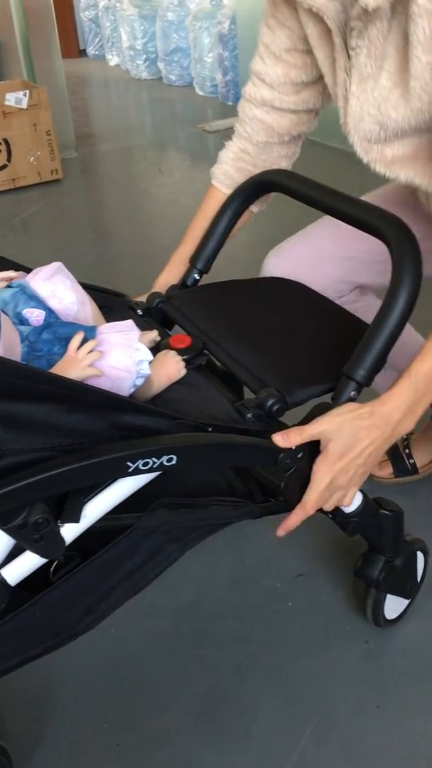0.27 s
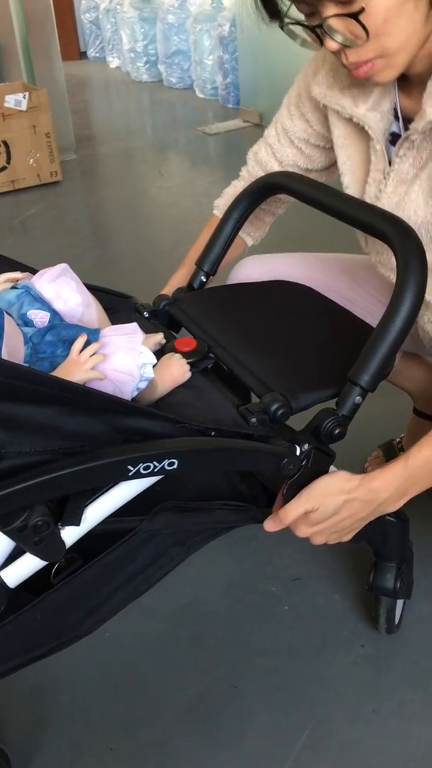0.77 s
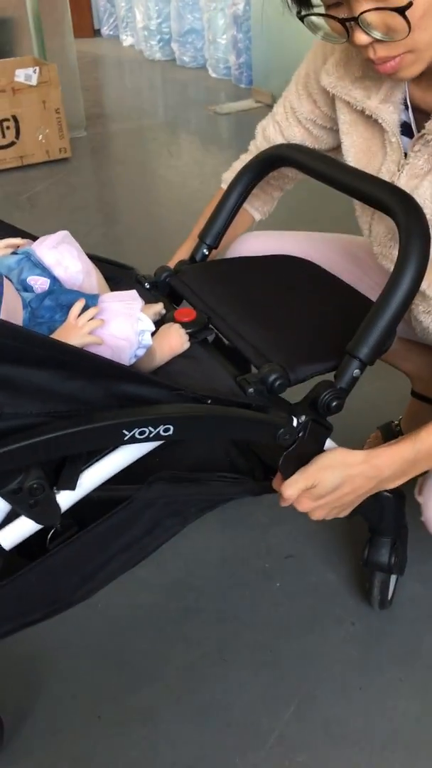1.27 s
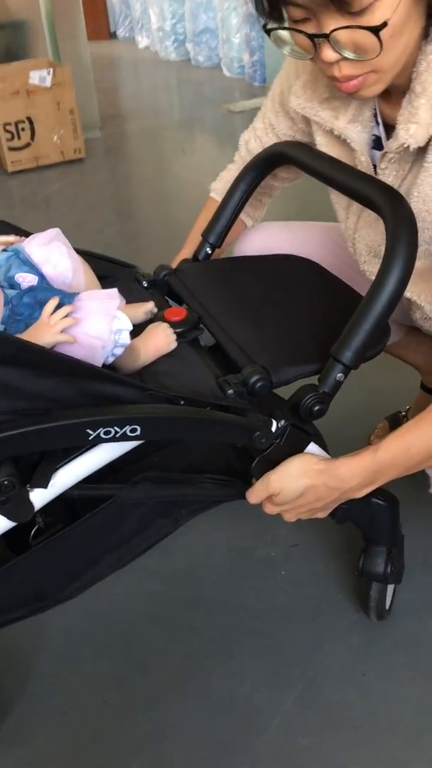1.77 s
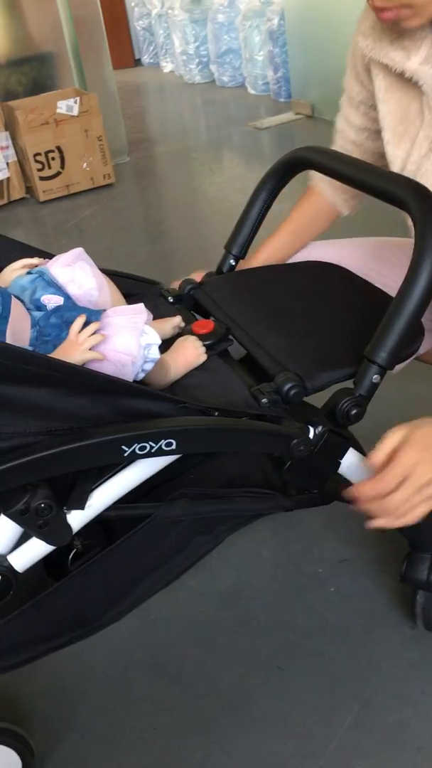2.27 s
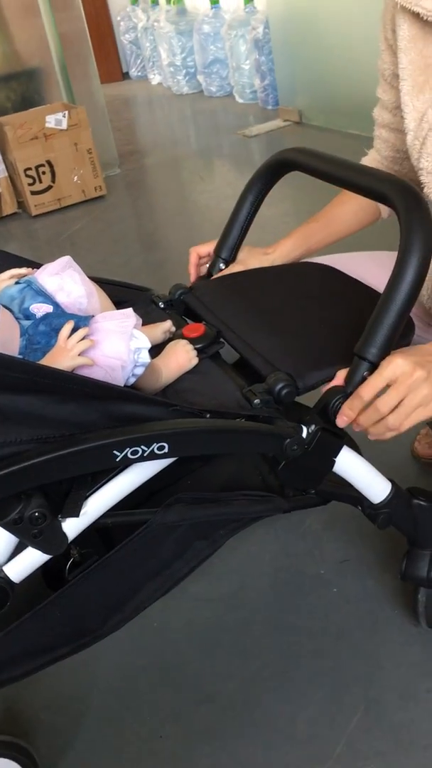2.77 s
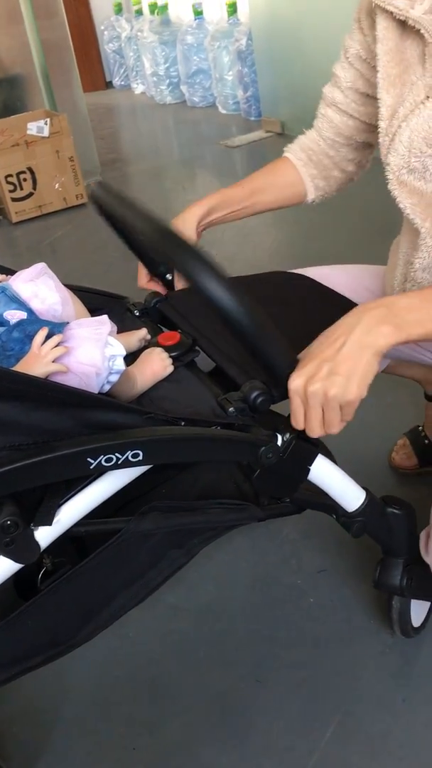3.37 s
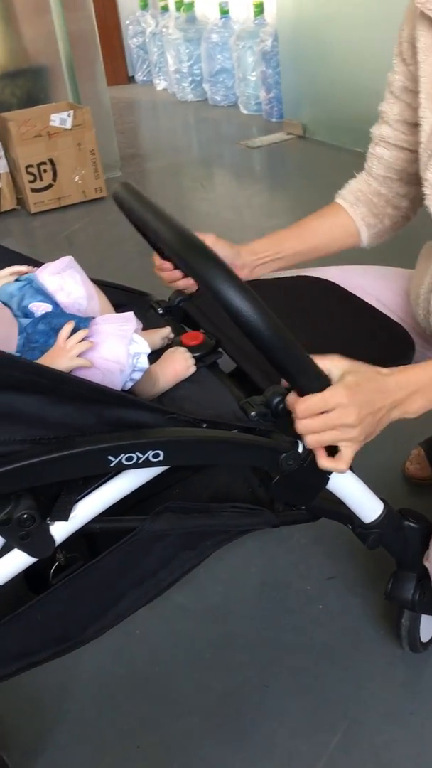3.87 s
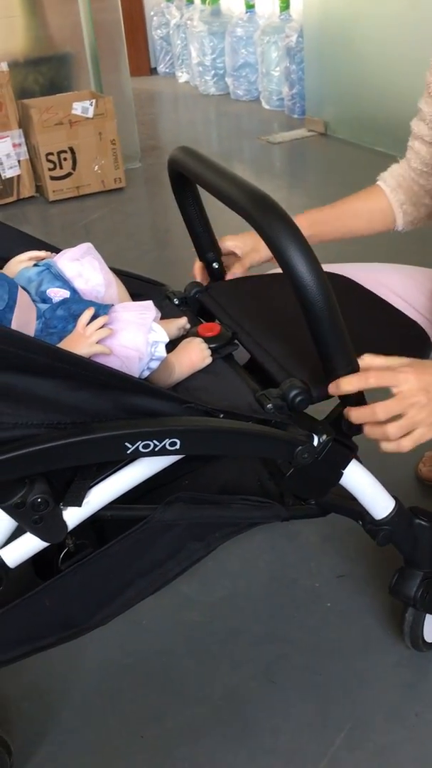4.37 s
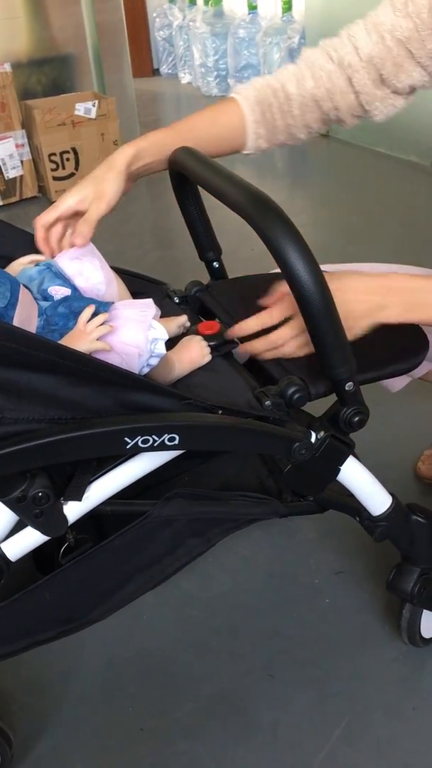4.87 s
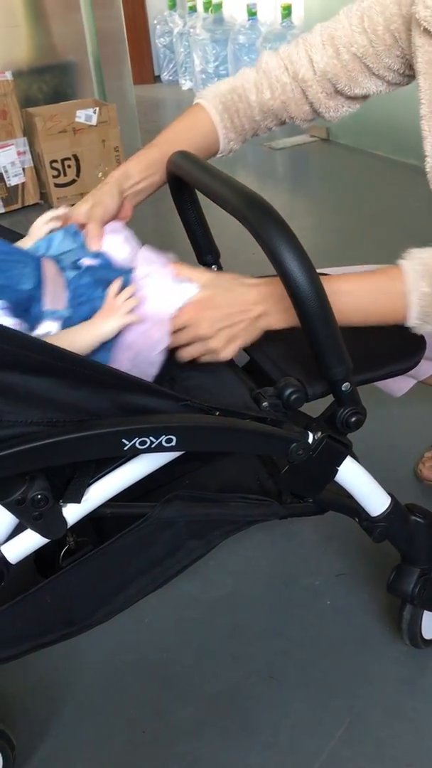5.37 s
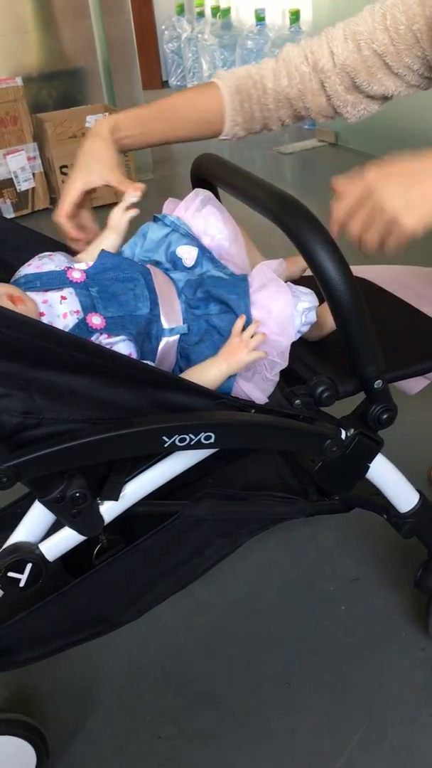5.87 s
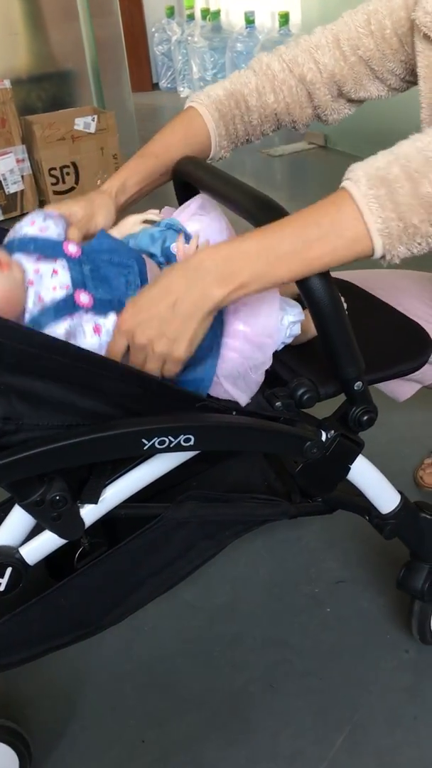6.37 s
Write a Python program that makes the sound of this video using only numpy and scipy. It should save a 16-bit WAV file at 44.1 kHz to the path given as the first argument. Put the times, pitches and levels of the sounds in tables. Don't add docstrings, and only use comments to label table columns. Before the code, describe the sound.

A phone microphone close to a pushchair frame picks up dry, bright plastic snaps with a short lively room tail: one early, a tight cluster just before two seconds, and another near four. Between them are tiny ticks and faint cloth movement. Later the hands leave the bar and handle a dressed doll, making smooth rubbing, dull dragging and crisp fabric rustles against quiet ventilation and distant low rumble.

```python
import sys
import numpy as np
from scipy import signal
from scipy.io import wavfile
from scipy.ndimage import uniform_filter1d

SR = 44100
rng = np.random.default_rng(int(sys.argv[2]) if len(sys.argv) > 2 else 0)


def voltage_ratio(decibels):
    exponent = np.asarray(decibels, float) / 20
    return 10 ** exponent


def pcm_store(signal):
    levels = np.round(np.clip(np.atleast_2d(signal), -1, 1) * 32767)
    wavfile.write(sys.argv[1], SR, levels.astype(np.int16).T)


N = 291501

# t/s, level fed to the room/dB, grit level/dB, grit time/ms
SNAPS = [
    (0.3174, -14.5, -14, 3.95),
    (1.7343, -12, -11.5, 1.34),
    (1.7806, -22.5, -26, 1),
    (1.9237, -10, -13.5, 2.6),
    (3.4301, -29.5, -28.5, 1.6),
    (3.6962, -29, -30.5, 1.6),
    (4.0464, -13.5, -16, 1.7),
]


def latches():
    catch_direct, catch_fed = catches()
    overtone_direct, overtone_fed = overtones()
    small_parts = signal.butter(2, 550, "high", fs=SR)
    direct = signal.lfilter(*small_parts, catch_direct + overtone_direct) + thuds()
    return direct, catch_fed + overtone_fed


def catches():
    # f/Hz, level/dB per Hz
    first_catch = [(240, -45.5), (400, -15), (552, -20), (605, -2), (738, -19.5), (860, -9.5), (1630, -9.5),
                   (2050, -9), (2350, -3), (3250, -3), (3550, -13), (5310, -6), (6190, -16.5),
                   (7440, -16.5), (10700, -24), (15500, -30.5)]
    clamp = [(88, -78), (150, -12), (445, -8), (607, 0.5), (751, -7), (1400, -10), (1700, -14.5),
             (2360, -5), (3910, -13), (5230, -10.5), (6470, -15), (8660, -13), (15500, -27)]
    clamp_seat = [(88, -60.5), (150, 14.5), (583, 6), (766, -3.5), (1020, 16.5), (1980, -1.5),
                  (2360, -14.5), (3980, 4), (8660, -5), (15500, -13.5)]
    lever = [(180, -54), (300, -12.5), (562, -8), (620, -3), (953, -3), (1030, -1.5), (1490, -13),
             (2480, -4.5), (3150, -8.5), (4000, -1), (5050, -11.5), (5570, -7.5), (9140, -15), (15500, -24)]
    near_pin = [(290, -43), (500, -12.5), (997, -0.5), (1450, -11.5), (1820, -12), (2760, -9.5),
                (3740, -6.5), (4770, -11.5), (7340, -14), (15500, -45)]
    hinge = [(410, -39), (700, -16), (1410, 0.5), (2310, -2.5), (2590, -17), (3820, -13), (4350, -15),
             (5570, -7.5), (8650, -15), (15500, -35.5)]
    lock = [(260, -66), (450, -14), (605, -7.5), (931, -6.5), (1050, 0), (1690, -5), (2070, -1), (3100, -6),
            (3490, -12), (3980, -6.5), (5690, -14), (6310, -9), (8240, -10.5), (15600, -23)]
    # f/Hz, t60/ms, ring in the room/dB
    main_modes = [(2580, 7.3, -23), (2550, 9.3, -24.5), (3200, 4.9, -33), (2525, 10.3, -14.5),
                  (1050, 9, -52), (1460, 24, -39), (2070, 3, -41)]
    # t/s, click level/dB, tilt/dB per octave, ring level/dB
    contact_lists = [
        [(.3174, -19, 5, -34), (.3192, -5, 6, -32), (.3209, -11, 1.5, -18)],
        [(1.7352, -11, 5, -29), (1.7362, -9, 2.5, -17.5), (1.7400, -20.5, -6, -38)],
        [(1.78, -17, 6.5, -15)],
        [(1.9232, -2, 2.5, -14), (1.9249, -6, 8, -3.5), (1.9274, -15, -2.5, -16)],
        [(3.4314, -25.5, 5, -48), (3.4334, -29.5, 1.5, -45), (3.4370, -39, -5.5, -35.5)],
        [(3.6974, -25, 4.5, -45), (3.6993, -34, -1, -39)],
        [(4.0400, -37, -4, -44), (4.0464, -24, 5, -40), (4.0473, -11, 2.5, -22), (4.0486, -11.5, -1.5, -18),
         (4.0500, -13.5, -4, -20), (4.0538, -26, -1, -30), (4.0598, -26, 4, -34), (4.0625, -24, -1, -18),
         (4.0660, -21, 1, -29)],
    ]
    direct, fed = np.zeros((2, N))
    seeds = rng.standard_normal((len(SNAPS), 1500))
    parts = first_catch, clamp, clamp_seat, lever, near_pin, hinge, lock
    for snap, mode, contacts, colour, seed in zip(SNAPS, main_modes, contact_lists, parts, seeds):
        s, room_db, grit_db, grit_ms = snap
        hz, t60_ms, hum_db = mode
        t60 = t60_ms / 1000
        grit = signal.oaconvolve(rush(grit_ms, seed), pulse(colour, tilt_db=-0.5))
        add(direct, s, peaked(grit, grit_db))
        add(fed, s, voltage_ratio(room_db + 15.0) * pulse(colour))
        add(fed, s, knell(hum_db, hz, t60))
        for k, (at, click_db, tilt_db, ring_db) in enumerate(contacts):
            chatter = signal.unit_impulse(100) + peaked(rush(0.4, seed[100 * k:][:100]), -7.0)
            click = np.convolve(chatter, pulse(colour, tilt_db))
            add(direct, at, peaked(click, click_db))
            add(direct, at, knell(ring_db, hz, t60))
    return direct, fed


def overtones():
    mode_lists = [
        [(3.3, -18, 2850, .011, -28), (1.8, -24, 3170, .014, -27), (2.9, -20, 2370, .011, -36),
         (1.8, -21, 5100, .012, -28), (1.8, -25, 4060, .01, -33), (1.8, -25, 1330, 0.015, -31),
         (1.8, -25, 1760, .012, -35), (1.9, -31, 420, .02, -44)],
        [(1.2, -24, 5340, .01, -32), (1.9, -23, 1620, .012, -34), (1.9, -26, 7200, .009, -38)],
        [],
        [(1.2, -15, 3930, .015, -27), (1.3, -25, 1000, .016, -30), (1.2, -23, 5500, .011, -31)],
        [],
        [(1.3, -33, 5800, .008, -48)],
        [(.9, -23, 1410, 0.012, -33), (.9, -24, 1070, 0.014, -30), (2.2, -21, 2400, 0.011, -36),
         (1.6, -21, 2110, .012, -38), (.9, -25, 6300, .012, -30), (.9, -26, 8860, .012, -38),
         (1.1, -27, 600, .016, -38), (.9, -27, 7550, .011, -38)],
    ]
    direct, fed = np.zeros((2, N))
    for snap, modes in zip(SNAPS, mode_lists):
        for late_ms, db, hz, t60, hum_db in modes:
            add(direct, snap[0] + abs(late_ms) / 1000, knell(db, hz, t60))
            add(fed, snap[0], knell(hum_db, hz, t60))
    return direct, fed


def thuds():
    # t/s, peak level/dB, f/Hz, t60/s
    flexings = [
        (1.295, -37, 56, 0.091),
        (1.734, -26, 252, 0.039),
        (1.736, -25, 655, 0.027),
        (1.782, -22, 216, 0.045),
        (2.101, -36, 223, 0.021),
        (1.923, -34.5, 197, 0.1),
        (1.924, -19, 913, 0.019),
        (4.048, -39.5, 251, 0.071),
    ]
    out = np.zeros(N)
    for s, db, hz, t60 in flexings:
        onset = 1 - np.exp(-np.arange(8000) / SR * hz * 4.2)
        add(out, s, knell(db, hz, t60) * onset)
    return out


def spring_bounces():
    # t/s, peak level/dB, f/Hz, slip time/ms, crack level/dB
    bounces = [
        (1.9326, -15, 8700, 0.44, -16),
        (1.958, -26, 8960, 0.49, -10),
    ]
    return ticks(bounces, width_hz=1500)


def small_ticks():
    # t/s, peak level/dB, f/Hz, slip time/ms, crack level/dB
    slips = [(0.2235, -46, 2600, 2, -20), (0.2295, -31.5, 2580, 1.1, -2), (0.2305, -38.5, 1300, 1.6, -20),
             (0.2785, -46, 3400, 2, -23), (0.6092, -31, 1470, .4, -33), (0.6105, -39, 2300, .3, -40),
             (1.024, -41.5, 638, 0.92, -30), (1.347, -50, 1050, 1.4, -31), (5.5226, -41, 2370, 1.2, -12),
             (5.511, -42, 900, 2, -25), (5.8044, -41, 1280, 1.5, -20), (6.401, -42, 1300, 1.5, -12),
             (3.661, -45, 1430, 1.9, -18.5), (3.6676, -41, 1390, 1.5, -16), (3.741, -38, 1750, 1.2, -9),
             (3.9303, -41.5, 2050, 2.1, -11), (3.9445, -38.5, 1740, 0.99, -6),
             (4.1683, -30, 2450, 1.8, -20), (5.1514, -58, 2520, 1.5, -9), (5.352, -41.5, 1560, 1.9, -9),
             (5.517, -42, 2360, 1.5, -9), (5.5505, -37, 3000, 1.1, -10), (5.556, -41, 3600, 1.1, -8),
             (5.5577, -37, 1500, 1.6, -9), (6.395, -34, 1150, .7, -14)]
    return ticks(slips, width_hz=710)


def seam_ticks():
    # t/s, peak level/dB, f/Hz, crack level/dB
    seams = [(0.221, -43, 5360, -9), (0.229, -34.5, 5400, -3), (0.2785, -50, 5600, -8),
             (4.04, -46, 5500, -5), (0.83, -39.5, 6850, 3), (0.8364, -50, 5900, -2), (1.148, -48, 8770, -4),
             (1.4057, -59, 10000, -6), (3.0804, -50, 5390, 2), (3.5754, -53, 5190, -1),
             (3.661, -43, 5400, -7), (3.6684, -43, 5560, -5), (3.7084, -41, 5630, -3),
             (3.93, -43, 6500, -9), (3.9454, -45, 6540, -13), (5.462, -42, 6690, -7),
             (5.5306, -49, 6730, -3)]
    slip_ms = 2.2
    return ticks([(s, db, hz, slip_ms, crack_db) for s, db, hz, crack_db in seams], width_hz=2700)


def buckle():
    # t/s, level/dB, f/Hz, t60/s
    knocks = [(5.447, -64, 6540, .12), (5.463, -54, 6600, .1), (5.500, -64, 9900, .12),
              (5.530, -60, 6500, .12), (5.530, -54, 14100, .03), (5.549, -51, 5070, 0.04),
              (5.565, -58, 9850, 0.2), (5.575, -60, 5000, 0.12), (5.447, -63, 5050, .15),
              (5.508, -60, 6200, .06), (5.580, -59, 6330, 0.4), (5.585, -63, 9800, .35),
              (5.705, -62, 6300, 0.4)]
    # frequency ratio, level/dB
    cluster = [
        (1.013, -3.5),
        (.981, -3),
    ]
    rise_s = .0015
    onset = 1 - np.exp(-np.arange(8000) / SR / rise_s)
    out = np.zeros(N)
    for s, db, hz, t60 in knocks:
        side_modes = sum(knell(db + side_db, hz * ratio, t60) for ratio, side_db in cluster)
        add(out, s, onset * (knell(db, hz, t60) + side_modes))
    return out


def sliding():
    slides = [(1.26, -71, 0.23, 0.18), (1.6, -63, 0.086, 0.61), (1.73, -56, 0.039, .05),
              (2.17, -53, 0.16, 0.4), (2.69, -49.5, 0.11, .2), (2.78, -42.5, 0.16, 0.34),
              (2.93, -51, .2, 0.33), (3.5, -67, .03, 0.22), (3.78, -61.5, .03, 0.19),
              (3.94, -59.5, .02, 0.094), (4.03, -62, 0.034, 0.057), (4.49, -50.5, .12, 0.22),
              (4.63, -44, 0.23, 0.52), (5.16, -63, 0.043, .3), (5.45, -61, 0.37, 0.22),
              (5.56, -55.5, 0.078, 0.22), (5.97, -46, 0.21, 0.51), (6.18, -47, 0.39, 0.44)]
    # f/Hz, level/dB per Hz
    slide_colour = [(500, -35), (850, -11), (1100, -0.5), (1420, -16), (1680, -5.5), (1990, -6),
                    (2380, 2.5), (2600, -2), (3000, 1.5), (3550, -4), (3950, -4), (5010, -12.5),
                    (5590, -12.5), (9080, -25), (15500, -42.5)]
    colour = [(250, -59.5)] + slide_colour
    return strokes(slides) * hiss(colour, patchy_db=0.5, flicker_db=0.5, size=256)


def dragging():
    drags = [(0.9, -64.5, 0.26, 0.66), (1.6, -52.5, 0.17, 0.43), (2.22, -50, 0.14, 0.33),
             (2.81, -56, 0.066, 0.7), (3.2, -65.5, 0.35, 0.28), (3.55, -60, 0.086, 0.44),
             (3.8, -62, 0.063, 0.17), (3.94, -62, .03, 0.14), (4.03, -57, 0.032, 0.059),
             (4.4, -58, .07, 0.31), (4.78, -53, 0.54, 0.39), (5.17, -55, 0.072, 1),
             (5.55, -51.5, 0.11, 0.35), (5.95, -42.5, 0.16, 0.48), (6.25, -51.5, 0.15, 0.42)]
    # f/Hz, level/dB per Hz
    drag_colour = [(53, -56), (90, -1), (233, -6.5), (465, -10), (636, -1.5), (749, -10), (807, -5),
                   (1800, -11), (2340, -27), (3960, -120)]
    return strokes(drags) * hiss(drag_colour, patchy_db=1.5, flicker_db=0.9)


def scuffing():
    scuffs = [
        (2.74, -52, 0.16, 0.35),
        (4.5, -53.5, 0.13, .5),
        (4.71, -54.5, 0.34, .2),
        (5.92, -54.5, 0.22, 0.59),
        (6.12, -55, 0.29, .3),
    ]
    # f/Hz, level/dB per Hz
    scuff_colour = [(3000, -11), (5500, -0.5), (9000, -4.5), (12000, -13), (16000, -20)]
    return strokes(scuffs) * hiss(scuff_colour, patchy_db=1.0, flicker_db=0.6, size=256)


def cloth():
    rustles = [(0.02, -60.5, .1, 0.44), (0.5, -59.5, 0.23, 0.71), (0.78, -64, 0.18, .05),
               (1.15, -68, .01, .1), (1.24, -61, 0.11, .03), (1.41, -68, .01, 0.24),
               (1.72, -57, 0.26, 0.11), (1.84, -56, .05, .12), (2.22, -52, 0.09, 0.29), (3.62, -64, .1, .1),
               (2.45, -60, .3, 0.44), (2.7, -56, 0.21, 0.21), (3.25, -77, .3, 0.31),
               (3.055, -65.5, .008, .015), (3.088, -68, .008, .015), (3.47, -57.5, .03, 0.18),
               (3.68, -61, 0.13, .1), (3.82, -54, 0.17, 0.13), (4.0, -63, 0.07, 0.18), (4.22, -68, .05, .2),
               (4.6, -64, .25, .3), (5.0, -65, .15, 0.089), (5.12, -54, 0.079, .25), (5.28, -58, .05, .08),
               (5.56, -49.5, 0.34, 0.73), (5.95, -60, .25, 0.57), (6.28, -45.5, .09, 0.13),
               (6.4, -47.5, 0.033, 0.044), (6.55, -59.5, 0.35, 0.54)]
    # f/Hz, level/dB per Hz
    cloth_colour = [(2500, 1), (5000, 1.5), (9000, -1.5), (13000, -4), (16000, -2)]
    return voltage_ratio(-4.0) * strokes(rustles) * hiss(cloth_colour, patchy_db=2.5, flicker_db=0.0, size=256)


def rumble():
    shudder = [
        (1.9, -52.5, 0.21, 0.31),
    ]
    # f/Hz, level/dB per Hz
    rumble_colour = [(18, -35), (30, -5), (44, 3.5), (54, 8), (66, 0), (113, -6), (130, -4.5), (265, -6),
                     (293, -3.5), (330, -12.5), (430, -42), (730, -120)]
    traffic_db = -59
    gain = np.hypot(voltage_ratio(traffic_db), strokes(shudder))
    return voltage_ratio(2.0) * gain * hiss(rumble_colour, patchy_db=-1.5, flicker_db=-2.2, size=2048)


def air():
    # f/Hz, level/dB per Hz
    air_colour = [(150, -39), (250, -10.5), (308, 0.5), (428, -4.5), (575, -2.5), (786, -5), (1090, -5),
                  (3090, -17.5), (4860, -25), (6300, -27.5), (15800, -35)]
    return voltage_ratio(-59) * hiss(air_colour, patchy_db=1.1, flicker_db=0.5, size=2048)


def early(x):
    # delay/ms, level/dB, scatter/ms
    echoes = [
        (1.937, -5.5, 0.13),
        (13.67, -18, 1.1),
        (19.86, -18, 0.96),
        (26.24, -18, 7.6),
    ]
    taps = signal.unit_impulse(3000)
    for (ms, db, scatter_ms), seed in zip(echoes, rng.standard_normal((len(echoes), 800))):
        smear = rush(scatter_ms, seed)
        add(taps, ms / 1000, voltage_ratio(db) * smear / np.linalg.norm(smear))
    return signal.oaconvolve(x, taps)[:N]


def room(x):
    # f/Hz, t60/s
    decay = [(150, 0.41), (600, 0.77), (1200, 0.76), (2400, 0.75), (4600, 0.69), (8000, 0.55), (10000, .5),
             (13000, 0.36)]
    taps = np.zeros(SR)
    at = np.arange(180, SR - 12, 12)
    taps[at + rng.integers(0, 12, len(at))] = rng.choice([-1., 1.], len(at))
    hz, t, z = signal.stft(taps, SR, nperseg=256)
    fading = voltage_ratio(-60 * t / read(decay, hz)[:, None])
    tail = signal.istft(z * fading, SR, nperseg=256)[1]
    return signal.fftconvolve(x, tail / np.linalg.norm(tail))[:N]


def ticks(table, width_hz):
    out = np.zeros(N)
    for (s, db, hz, slip_ms, crack_db), seed in zip(table, rng.standard_normal((len(table), 2000))):
        add(out, s - .001, tick(db, hz, width_hz, slip_ms, crack_db, seed))
    return out


def tick(db, hz, width_hz, slip_ms, crack_db, seed):
    swarm = peaked(rush(slip_ms, seed), -4.0) + signal.unit_impulse(len(seed), idx=30)
    body = ring(ring(swarm, hz, width_hz), hz, 2 * width_hz)
    crack = np.diff(swarm, prepend=0)
    return peaked(evened(body) + voltage_ratio(crack_db) * evened(crack), db)


def rush(slip_ms, seed):
    u = np.arange(len(seed)) / SR * 1000 / max(slip_ms, .1)
    return seed * u ** 1.09 * np.exp(-1.6 * u)


def pulse(colour, tilt_db=0, size=2048):
    hz = abs(np.fft.fftfreq(size, 1 / SR))
    level_db = read(colour, hz) + tilt_db * np.log2(hz / 2500 + .02)
    log_gain = np.log(voltage_ratio(np.maximum(level_db, -90)))
    click = np.fft.ifft(np.exp(signal.hilbert(log_gain).conj())).real[:size // 2]
    return click / np.linalg.norm(click)


def knell(db, hz, t60):
    t = np.arange(8000) / SR
    return voltage_ratio(db - 60 * t / t60) * np.sin(2 * np.pi * hz * t)


def ring(x, hz, width_hz):
    r = np.exp(-np.pi * width_hz / SR)
    pole = r * np.exp(2j * np.pi * hz / SR)
    return 2 * signal.lfilter([1 - r], [1, -pole], x).real


def strokes(table):
    depth_db, rise_bend, fall_bend = 21.5, 1.78, 1.42
    s, db, rise, fall = np.transpose(table)[:, :, None]
    at = np.arange(0, N + 64, 64)
    late = at / SR - s
    sunk = np.where(late < 0, abs(late / rise) ** rise_bend, abs(late / fall) ** fall_bend)
    gain = np.linalg.norm(voltage_ratio(db - depth_db * sunk), axis=0)
    return np.interp(np.arange(N), at, gain)


def hiss(colour, patchy_db, flicker_db, size=512):
    frames, hz = 4 * N // size + 5, np.fft.rfftfreq(size, 1 / SR)
    a, b, patches = rng.standard_normal((frames, len(hz), 3)).T
    patches = uniform_filter1d(patches, size=6, axis=0)
    patches = evened(uniform_filter1d(patches, size=16, axis=1))
    flicker = evened(uniform_filter1d(rng.standard_normal(frames), size=4))
    level_db = read(colour, hz)[:, None] + patchy_db * patches + flicker_db * flicker
    z = (a + 1j * b) * voltage_ratio(level_db)
    return evened(signal.istft(z, nperseg=size, noverlap=3 * size // 4)[1][:N])


def read(points, hz):
    f, value = np.transpose(points)
    return np.interp(np.log(hz + 1), np.log(f + 1), value)


def evened(x):
    return x / np.sqrt(np.mean(x ** 2) + 1e-20)


def peaked(x, db):
    return voltage_ratio(db) * x / abs(x).max()


def add(mix, s, sound):
    part = mix[round(s * SR):][:len(sound)]
    part += sound[:len(part)]


def scene():
    direct, fed = latches()
    small, seams = small_ticks(), seam_ticks()
    near = direct + small + seams + spring_bounces() + buckle()
    reverberant = room(fed + voltage_ratio(-3.5) * small + voltage_ratio(-4.5) * seams)
    rubbing = sliding() + dragging() + scuffing() + cloth()
    return (early(near) + reverberant + rubbing + air() + rumble())[None]


def low_pass(x):
    return signal.sosfilt(signal.butter(12, 16750, fs=SR, output="sos"), x)


def record(dry):
    # f/Hz, level/dB
    response = [(25, -6), (50, -0.5), (4300, 0), (4900, -3), (5400, 1), (9600, 0), (10500, -3),
                (11500, 0.5), (15600, -3.5), (16300, -31), (17000, -58)]
    hz = np.linspace(0, SR / 2, 1025)
    port = signal.firwin2(1023, hz, voltage_ratio(read(response, hz)), fs=SR)
    limited = 1.3 * np.tanh(dry / 1.3)
    return low_pass(signal.oaconvolve(limited, port[None], "same"))


dry = scene()
out = record(dry)
pcm_store(out)
```